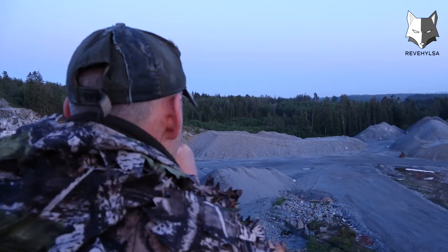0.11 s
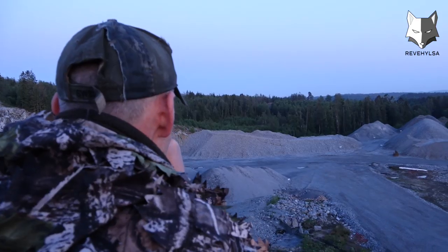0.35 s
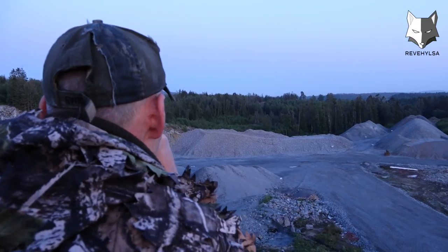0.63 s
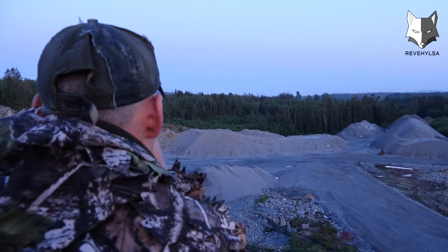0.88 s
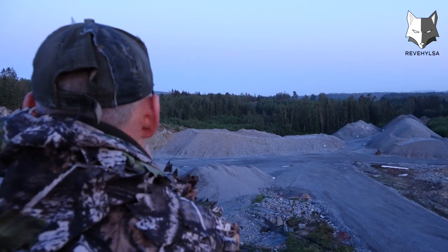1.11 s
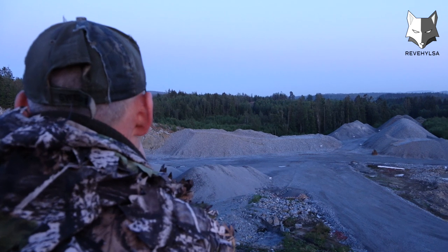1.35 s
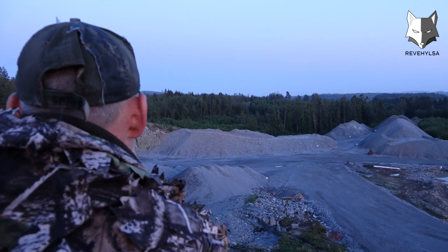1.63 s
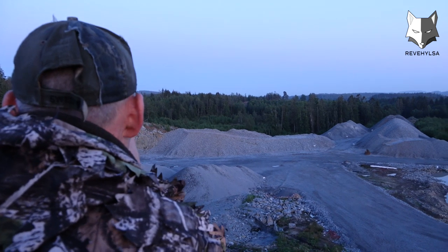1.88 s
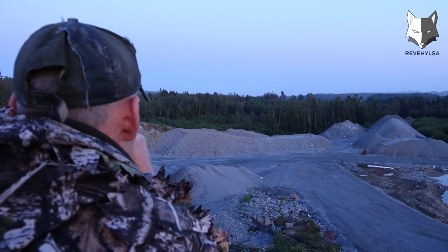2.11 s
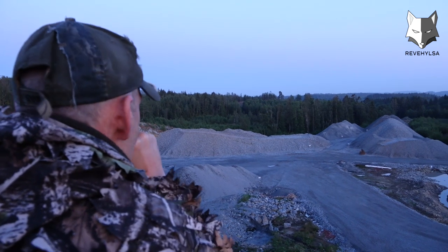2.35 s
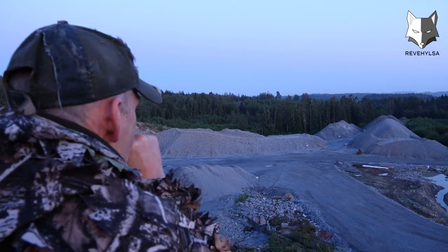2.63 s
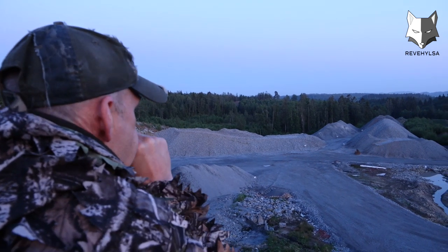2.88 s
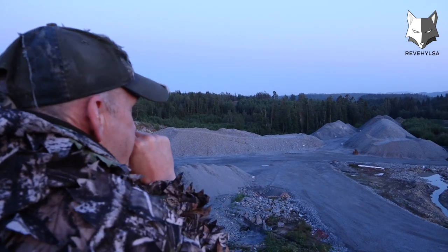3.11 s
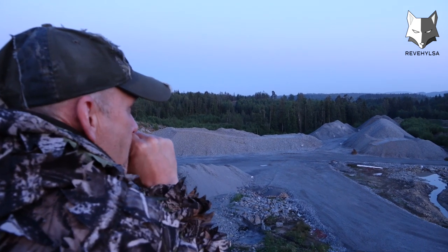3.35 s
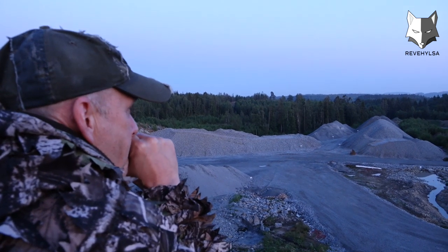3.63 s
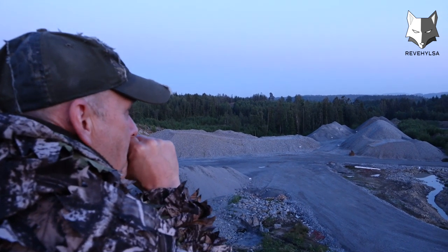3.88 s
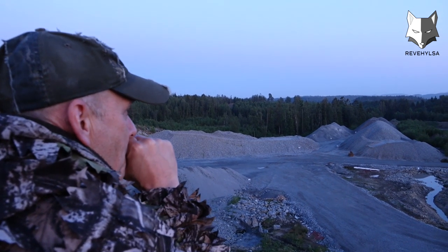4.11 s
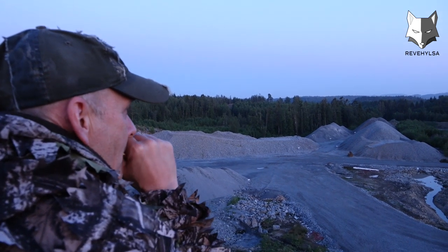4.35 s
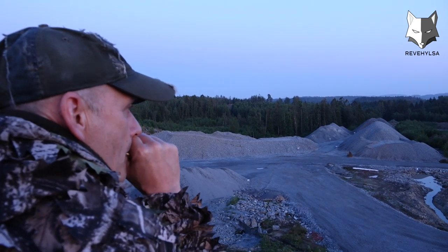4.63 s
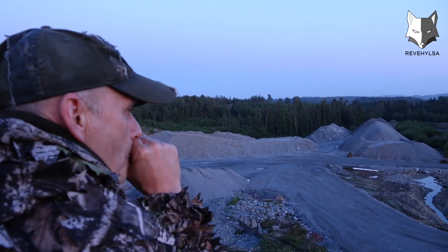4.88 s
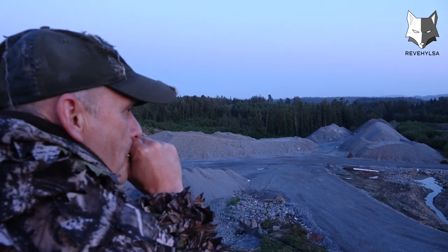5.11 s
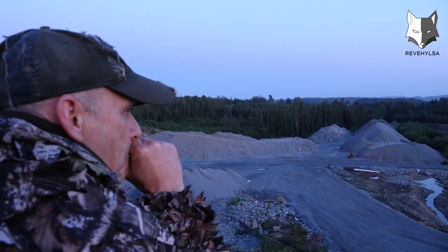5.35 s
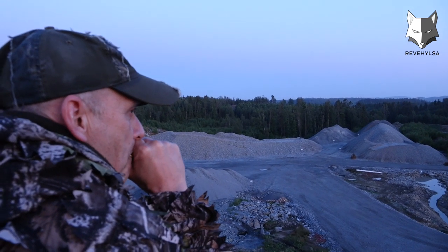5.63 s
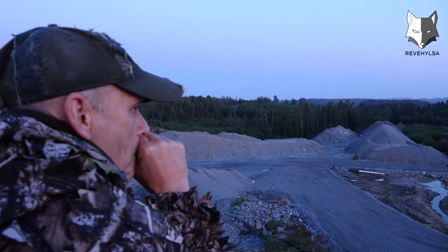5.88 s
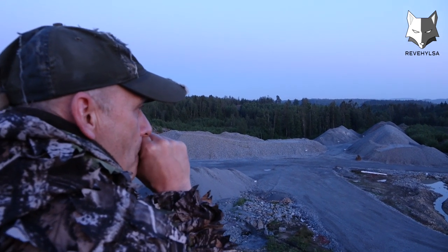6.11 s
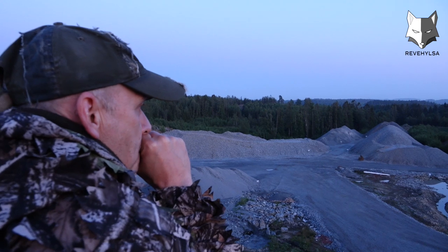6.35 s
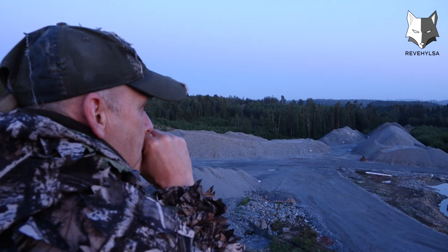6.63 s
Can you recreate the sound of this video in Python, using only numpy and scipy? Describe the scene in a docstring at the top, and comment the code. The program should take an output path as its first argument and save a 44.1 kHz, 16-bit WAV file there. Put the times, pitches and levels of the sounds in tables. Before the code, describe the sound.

After half a second of soft wind rumble, a hand-cupped reed call cries loudly and close by. Two or three wavering wails come first, then short broken yelps that crack into rasps and thin squeals, then longer wails with gaps between. A brief squeak leads into the last falling cry, almost at the end. Open gravel pit, nearly dry, with very faint echo; one close microphone, mono.

```python
"""A mouth-blown reed call cries over an open gravel pit, close to one microphone.
Light wind rumbles throughout over a thin hiss. From 0.6 s the reed beats about a thousand times a second,
its pitch wavering, the cupped hand colouring each cry; the ground and far heaps answer faintly.
From 2.2 s it also breaks into half-rate or ragged beats, and near 2.6, 2.9 and 6.3 s into a thin squeal.
After longer gaps around 4.7 and 6 s the last cry runs to 6.76 s, almost the end."""
import sys
import numpy as np
from scipy import signal
from scipy.fft import rfft, irfft, next_fast_len
from scipy.io import wavfile
from scipy.ndimage import uniform_filter1d, map_coordinates

SR = 44100
rng = np.random.default_rng(int(sys.argv[2]) if len(sys.argv) > 2 else 0)


def how_loud(loudness_db):
    """Turn decibels into a plain amplitude multiplier (0 dB gives 1, 20 dB gives 10)."""
    steps = np.asarray(loudness_db, float) / 20
    return 10 ** steps


def unload_audio(sound):
    """Save the sound as a 16-bit wav file, at the path given as the first command line argument."""
    columns = np.transpose(np.atleast_2d(sound))
    # keep every value between -1 and 1, then stretch to whole-number steps
    steps = np.round(np.clip(columns, -1, 1) * 32767)
    wavfile.write(sys.argv[1], SR, steps.astype(np.int16))


N = 297234  # length [samples]
HOP = 64  # step of the moving colour [samples]


def reed():
    """One puff of air a beat, coloured by barrel and hand, plus the reed's own steady swing."""
    pitch, level_db, hand, edge, gate = playing()
    turns = np.cumsum(pitch) / SR
    puffs, at, ragged = puff_train(turns, pitch, level_db, hand, edge, gate)
    call = move_hand(ring(puffs), pitch, hand, edge, gate, at, ragged)
    # the reed's own swing stays on pitch while its puffs go ragged
    swing_size = 0.83 * np.interp(np.arange(N), at, ragged) * how_loud(level_db) * gate
    return call + swing_size * np.sin(2 * np.pi * turns + 0.95)


# crests and troughs of the wavering pressure, one table a cry, the last step being the cut-off:
# (time [s], pitch [Hz])
CRY_PITCH = [
    [(0.597, 884.5), (0.62, 1002), (0.645, 1051), (0.701, 986), (0.735, 1030), (0.762, 1098), (0.795, 1006),
     (0.832, 962.6), (0.877, 1011), (0.905, 964.2), (0.942, 932), (0.973, 949.6), (0.999, 989),
     (1.064, 916), (1.119, 980.6), (1.18, 901.7), (1.232, 950), (1.293, 885.3), (1.345, 923.2),
     (1.375, 872), (1.399, 809.4), (1.414, 803.5)],
    [(1.572, 892.4), (1.604, 1036), (1.632, 956), (1.666, 903), (1.712, 962), (1.77, 872.4), (1.826, 981.5),
     (1.864, 900.4), (1.908, 806.3), (1.924, 770)],
    [(2.025, 902.4), (2.063, 1084), (2.12, 949), (2.168, 1092), (2.181, 1013), (2.199, 1037), (2.23, 975.5),
     (2.26, 1023), (2.305, 876.3), (2.327, 804.3), (2.345, 762)],
    [(2.435, 921.6), (2.457, 1173), (2.477, 1147), (2.531, 1078), (2.549, 1078), (2.575, 1043),
     (2.601, 1116), (2.607, 1153)],
    [(2.69, 891), (2.72, 981.7), (2.738, 903), (2.75, 845), (2.77, 812)],
    [(2.861, 904.5), (2.875, 1056), (2.905, 967), (2.915, 990)],
    [(3.209, 1116), (3.253, 1028), (3.287, 892.4), (3.311, 828), (3.325, 764.5), (3.337, 742)],
    [(3.44, 907), (3.466, 1145), (3.49, 1279), (3.542, 1224), (3.572, 1069), (3.578, 1067)],
    [(3.734, 1123), (3.76, 1061), (3.789, 1042), (3.827, 1070), (3.862, 997), (3.886, 965), (3.914, 987),
     (3.944, 1058), (4.008, 938.5), (4.064, 1035), (4.092, 969), (4.131, 918), (4.18, 973.6), (4.241, 896),
     (4.289, 955.2), (4.346, 877.5), (4.384, 894.3), (4.414, 862), (4.428, 823.7), (4.452, 762.4)],
    [(4.976, 911), (5.015, 1113), (5.06, 1117), (5.125, 1111), (5.168, 1118), (5.185, 1178), (5.207, 1126),
     (5.239, 1182), (5.275, 1088), (5.295, 1056), (5.334, 1083), (5.379, 978), (5.393, 1042), (5.417, 1044),
     (5.443, 1099), (5.455, 1115), (5.469, 1090), (5.526, 974), (5.565, 1022), (5.633, 926.4),
     (5.676, 960.5), (5.761, 886), (5.785, 880), (5.808, 818), (5.828, 762)],
    [(6.247, 900), (6.273, 1109), (6.306, 1187), (6.312, 1222)],
    [(6.401, 1127), (6.423, 1042), (6.437, 1073), (6.484, 974), (6.499, 1044), (6.522, 1085), (6.586, 1008),
     (6.639, 1078), (6.695, 958), (6.739, 947), (6.76, 937)],
]
# loudness, one row a cry: (first level at the knee pitch [dB], last level there [dB],
# slope below the knee [dB per octave])
CRY_LEVELS = [(-16.5, -15, 19), (-15.5, -16.5, 35), (-14.5, -15.5, 36), (-17, -19, 20), (-14, -19, 24),
              (-20, -13, 19), (-14, -24.5, 27), (-16, -17.5, 40), (-16, -15.5, 53.4), (-15.5, -19, 32),
              (-16.5, -18, 19), (-18, -16, 84)]
# the grip, one row a cry: (first hand closing [steps], last hand closing [steps],
# first edge [steps], last edge [steps])
CRY_GRIPS = [(1.4, 2.5, 0.75, 0.029), (1.1, 1.53, .5, 0.12), (.7, -0.1, -1.2, -1.6), (.3, -1.1, -1, -1.8),
             (-.8, -0.4, -1.3, -2), (0, -1.5, 0.84, -1.2), (-1.6, -.5, -0.74, -3.6),
             (-2.4, -2, 0.095, -2.3), (-1.59, -1.75, -1, -1.8), (-1.4, 0, 1.2, 1.2),
             (-0.84, -1.17, 0.83, -0.25), (-0.75, -0.04, -0.34, 2)]


def playing():
    """Pitch sets the loudness; the hand moves evenly through each cry; a slack reed turns hollow and dull."""
    knee_hz, hard_db_per_oct = 959.3, 14.5  # louder as the pitch rises, at this slope above the knee
    cut_db = -33  # change over the cut-off
    slack_hz, slack_span_hz = 880, 50  # the reed slackens as it sinks under this pitch
    slack_hand, slack_edge = 0.78, -0.89  # steps added when fully slack
    (pitch,), gate = control_curves(CRY_PITCH, attack=.004, release=.003, order=3, ease=SR // 80)
    ramps = []
    for rows, levels, grip in zip(CRY_PITCH, CRY_LEVELS, CRY_GRIPS):
        first_db, last_db, slope = levels
        hand0, hand1, edge0, edge1 = grip
        ramps.append([(rows[0][0], first_db, slope, hand0, edge0, 0),
                      (rows[-2][0], last_db, slope, hand1, edge1, 0),
                      (rows[-1][0], last_db, slope, hand1, edge1, 1)])
    curves, _ = control_curves(ramps, attack=.004, release=.003, order=1)
    level_db, soft_db_per_oct, hand, edge, cut = curves
    octaves = np.log2(np.maximum(pitch, 100) / knee_hz)
    slope = np.where(octaves < 0, soft_db_per_oct, hard_db_per_oct)
    level_db = level_db + slope * octaves + cut_db * cut
    slack = np.clip((slack_hz - pitch) / slack_span_hz, 0, 1)
    return pitch, level_db, hand + slack_hand * slack, edge + slack_edge * slack, gate


# the reed loses its even beat, softened over three beats:
# (start [s], end [s], every-other-beat shift [0-1 period], raggedness [0-1])
BEAT_BREAKS = [(2.173, 2.196, 0, .18), (2.456, 2.518, .05, .14), (2.518, 2.577, .13, .045),
               (2.687, 2.718, .15, .1), (2.883, 2.916, 0, .17), (3.205, 3.223, 0, .18),
               (3.468, 3.574, 0, .12), (3.73, 3.749, 0, .18), (5.017, 5.026, .1, .1),
               (5.026, 5.059, .11, .012), (5.059, 5.068, .11, .09), (5.068, 5.12, .11, .007),
               (5.12, 5.178, .11, .004), (5.178, 5.27, .03, .13), (5.27, 5.35, .12, .004),
               (5.35, 5.374, .12, .014), (5.374, 5.388, .12, .06), (5.446, 5.47, 0, .15),
               (6.273, 6.312, 0, .15), (6.398, 6.428, .1, .045), (6.428, 6.488, .12, .006),
               (6.488, 6.496, .1, .05)]


def puff_train(turns, pitch, level_db, hand, edge, gate):
    """One pulse a beat; alternating shifts give half-pitch lines, irregular ones a rasp."""
    rasp_db = -17  # change at full raggedness
    beat = np.arange(1, int(turns[-1]))
    at = np.interp(beat, turns + np.arange(N) / N / SR, np.arange(N))
    sample = at.astype(int)
    shift, ragged = np.zeros(len(at)), np.full(len(at), .0004)
    for start, end, every_other, rasp in BEAT_BREAKS:
        inside = (at >= start * SR) & (at < end * SR)
        shift[inside], ragged[inside] = np.clip(every_other, 0, 1), np.clip(rasp, 0, 1)
    shift, ragged = uniform_filter1d(shift, size=3), uniform_filter1d(ragged, size=3)
    odd = (-1) ** beat
    # a rasp is part chance, part patterns of two and three beats that come and go, part fast drift
    luck = rng.standard_normal((len(at), 2))
    drifts = [wobble(170)[sample] for _ in range(3)]
    torn = 0.53 * luck[:, 0] + 0.62 * odd * drifts[0]
    torn = torn + 1.3 * np.cos(2 * np.pi * beat / 3) * drifts[1] + 0.74 * drifts[2]
    # puffs are scaled so that even beats reach the wanted level after colouring
    period = SR / np.maximum(pitch[sample], 100)
    partials = pitch[sample, None] * np.arange(1, 16)
    gains = how_loud(body_db(partials, hand[sample, None], edge[sample, None])) * abs(barrel(partials))
    size = how_loud(level_db[sample]) * gate[sample] * period / np.sqrt(2 * (gains ** 2).sum(1))
    size = size * how_loud(rasp_db * ragged) * (1 + .5 * shift * odd)
    size = size * how_loud(np.clip(ragged * (12 * luck[:, 1] + 14 * drifts[0]), -6, 2))
    return pulses(at + period * (shift * odd + ragged * torn), size), at, ragged


def ring(puffs):
    """The resting colour of barrel and hand rings after each puff (minimum phase)."""
    m = next_fast_len(N + SR // 4)
    hz = np.fft.rfftfreq(m, 1 / SR)
    cepstrum = irfft(np.log(how_loud(body_db(hz, 0, 0))), m)
    fold = np.r_[1, np.full(m // 2 - 1, 2), np.zeros(m - m // 2)]
    body = np.exp(rfft(cepstrum * fold))
    smear = np.exp(-1j * np.pi * .0012 * hz ** 2 / 12000)  # treble trails behind: 1.2 ms at 12 kHz
    return irfft(rfft(puffs, m) * body * smear * barrel(hz), m)[:N]


# a partial crosses the hollow of the hand and swells:
# (time [s], spread [s], level [dB], multiple of the pitch [ratio])
HAND_SWELLS = [(1.391, .007, 16, 2), (2.321, 0.0033, 11, 2), (2.756, 0.007, 11.5, 2), (3.283, 0.013, 18, 2),
               (3.324, .006, 11, 2), (4.427, 0.0079, 5, 2), (5.802, 0.0056, 16.5, 2),
               (6.489, 0.018, 12, 1.5), (6.735, 0.013, 20, 2)]


def move_hand(rung, pitch, hand, edge, gate, at, ragged):
    """The moving hand reweights the ringing colour from moment to moment."""
    hz, t, z = signal.stft(rung, SR, nperseg=4 * HOP, noverlap=3 * HOP)
    hz = hz[:, None]
    held = np.flatnonzero(gate)
    moving = [np.clip(np.interp(t * SR, held, control[held]), -2, 2) for control in (hand, edge)]
    z = z * how_loud(body_db(hz, *moving) - body_db(hz, 0, 0))
    # ragged puffs leave the barrel's upper mode free to ring out
    upper_mode = np.exp(-((hz - BARREL_MODES[1][0]) / 250) ** 2)
    z = z * how_loud(36 * np.interp(t * SR, at, ragged) * upper_mode)
    for s, spread, db, multiple in HAND_SWELLS:
        hollow_hz = multiple * pitch[min(round(s * SR), N - 1)]
        z = z * how_loud(db * np.exp(-((hz - hollow_hz) / 450) ** 2 - ((t - s) / spread) ** 2 / 2))
    return signal.istft(z, SR, nperseg=4 * HOP, noverlap=3 * HOP)[1][:N]


# colour of barrel and hand: (frequency [Hz], level [dB], hand closing [dB per step], edge [dB per step])
BODY_COLOUR = [(656, -3, 5, 4.5), (1224, 4, 4.5, 6.5), (1553, -5, 5.5, 0), (1960, -4, 0.17, 7),
               (2210, -5.5, 2.5, 6.5), (2950, 2.2, 0.17, 7), (3250, -4.5, -0.7, 5), (3820, 0, 0.86, 5.5),
               (4753, -5.5, 1, 3), (5270, -22, -2.5, 2.6), (6594, -14.5, -5.5, 6), (7290, -10, 2.5, 7.5),
               (8040, -10, 0.66, 6), (10320, -3.5, 0.7, 10), (10970, -14.5, -0.5, 8),
               (11980, -28, 1.5, 3.5), (13100, -32.5, 0, 2.5), (14100, -24.5, -2, 4),
               (16000, -39, 1.7, 1.7)]


def body_db(hz, hand, edge):
    """Barrel and hand shape the spectrum according to closing and edge; the short tube radiates no bass."""
    knots, plain, per_hand, per_edge = np.transpose(BODY_COLOUR)
    low_cut = -4 * np.clip(np.log2(knots[0] / (hz + 1)), 0, 4) ** 2
    hand_db = hand * along(knots, per_hand, hz)
    edge_db = edge * along(knots, per_edge, hz)
    return along(knots, plain, hz) + low_cut + hand_db + edge_db


# the barrel's modes, one broad and one narrow: (centre [Hz], width [Hz], lift [dB])
BARREL_MODES = [(1840, 660, 4.5), (3234, 75, 2)]


def barrel(hz):
    """The tube passes everything and lifts its modes."""
    response = 1
    for centre, width, db in BARREL_MODES:
        damping = 1j * hz * width
        response = response * (1 + (how_loud(db) - 1) * damping / (centre ** 2 - hz ** 2 + damping))
    return response


# the reed jumps to a high mode, one table a squeal: (time [s], pitch [Hz], level [dB])
SQUEAL_GLIDES = [
    [(2.6, 2410, -12), (2.606, 4803, -37.5), (2.622, 4660, -25.5), (2.652, 4425, -17.5), (2.656, 3213, -17),
     (2.682, 3200, -19.5), (2.69, 3026, -15.5)],
    [(2.893, 2450, -13.5), (2.905, 2765, -17), (2.915, 2992, -35)],
    [(6.311, 5000, -59), (6.347, 4820, -34), (6.351, 4660, -32.5), (6.385, 4510, -23), (6.388, 3317, -18.5),
     (6.398, 3327, -25), (6.403, 1863, -17)],
]


def squeal():
    """A nearly pure gliding tone, with two overtones that sound where they meet a top resonance."""
    ring_hz, ring_width_hz, ring_db = 9700, 1300, -30
    faint_db = -42  # floor of the overtones, divided by their number
    (pitch, tone_db), gate = control_curves(SQUEAL_GLIDES, attack=.003, release=0.0035, order=1)
    phase = 2 * np.pi * np.cumsum(pitch) / SR
    tone = how_loud(tone_db) * np.sin(phase)
    for k in (2, 3):
        resonance = np.exp(-((k * pitch - ring_hz) / ring_width_hz) ** 2)
        tone = tone + (how_loud(faint_db) / k + how_loud(ring_db) * resonance) * np.sin(k * phase)
    return gate * np.sqrt(2) * tone


# near ground and far heaps: (delay [s], level [dB], smear t60 [s])
GROUND_ECHOES = [(.012, -38, .05), (.15, -50, .6)]


def ground(x):
    """The ground and the heaps each answer with a faint decaying smear of noise."""
    answer, t = np.zeros(SR), np.arange(SR // 2) / SR
    for delay, db, t60 in GROUND_ECHOES:
        tail = rng.standard_normal(len(t)) * how_loud(-60 * t / t60)
        answer[round(delay * SR):][:len(t)] += how_loud(db) * tail / np.linalg.norm(tail)
    return signal.fftconvolve(x, answer)[:N]


# course of the wind, before its small random wobble: (time [s], level [dB])
WIND_LEVEL = [(0, -46.5), (3, -45.5), (4.2, -50), (6.74, -49.5)]
# colour of the wind: (frequency [Hz], relative level per Hz [dB])
RUMBLE_COLOUR = [(12, -25), (24, 6), (45, -9), (100, 1), (125, -9), (210, -13), (320, -21), (520, -27),
                 (1000, -60)]
# colour of the hiss: (frequency [Hz], relative level per Hz [dB])
HISS_COLOUR = [(300, -30), (600, 0), (2000, -4), (3200, -10), (10000, -15), (16000, -25)]
# thin steady tones in the floor: (frequency [Hz], peak level [dB])
WHINE_TONES = [(4010, -78), (6010, -80)]


def air():
    """Wind is low noise whose level drifts, over steady faint hiss noise and two thin sine tones."""
    hiss_db = -65
    t = np.arange(N) / SR
    wind_db = np.interp(t, *np.transpose(WIND_LEVEL)) + 1.2 * wobble(3)
    whine = sum(how_loud(db) * np.sin(2 * np.pi * hz * t) for hz, db in WHINE_TONES)
    return how_loud(wind_db) * noise(RUMBLE_COLOUR) + how_loud(hiss_db) * noise(HISS_COLOUR) + whine


def control_curves(tables, attack, release, order, ease=1):
    """Splines through each table's columns (corners eased over some samples), and a gate open only there."""
    t = np.arange(N) / SR
    cols, gate = np.zeros((len(tables[0][0]) - 1, N)), np.zeros(N)
    for rows in tables:
        s, *values = np.transpose(rows)
        on = (t > s[0] - attack) & (t < s[-1] + release)
        knot = np.interp(t[on], s, np.arange(len(s)))
        knot = uniform_filter1d(knot, size=ease, mode="nearest")
        cols[:, on] = [map_coordinates(v, [knot], order=order, mode="nearest") for v in values]
        opening, closing = (t[on] - s[0]) / attack + 1, (s[-1] - t[on]) / release + 1
        gate[on] = np.clip(np.minimum(opening, closing), 0, 1)
    return cols, gate


def pulses(at, size):
    """Unit pulses between samples, as windowed sincs, scaled by size."""
    spot = np.floor(at)[:, None] + np.arange(-8, 9)
    offset = spot - at[:, None]
    shape = np.sinc(offset) * np.cos(np.pi * offset / 18) ** 2
    return np.bincount(np.clip(spot, 0, N - 1).astype(int).ravel(), (shape * size[:, None]).ravel(), N)


def along(hz_points, values, hz):
    """Points joined on a log-frequency axis."""
    return np.interp(np.log(hz + 1), np.log(hz_points + 1), values)


def wobble(rate):
    """A smooth random curve, rate knots a second."""
    return map_coordinates(rng.standard_normal(int(N * rate / SR) + 4), [np.arange(N) * rate / SR])


def noise(spectrum):
    """Noise of rms 1 with the given colour."""
    hz, db = np.transpose(spectrum)
    colour = how_loud(along(hz, db, np.fft.rfftfreq(N, 1 / SR)))
    x = irfft(rfft(rng.standard_normal(N)) * colour, N)
    return x / x.std()


def scene():
    """The call and its echoes, its puffs pushing the wave downward, with the air, alike in both channels."""
    call = reed() + squeal()
    return np.tile(air() - call - ground(call), (2, 1))


def roll_off(x):
    """The treble ends steeply here."""
    return signal.sosfilt(signal.butter(12, 16880, fs=SR, output="sos"), x)


def record(dry):
    """The input rounds off the sharpest peaks as they near 0.8 of full scale."""
    rounded = dry / (1 + abs(dry / 0.8) ** 4) ** (1 / 4)
    return roll_off(rounded)


dry = scene()
out = record(dry)
unload_audio(out)
```